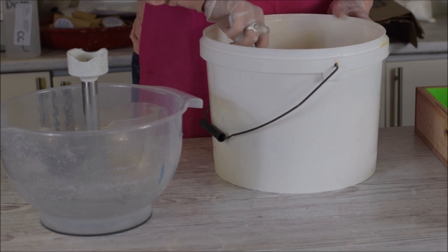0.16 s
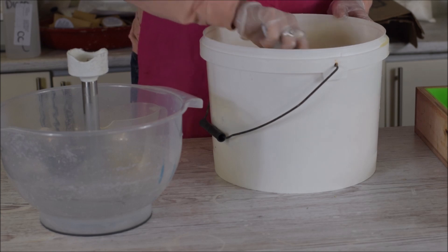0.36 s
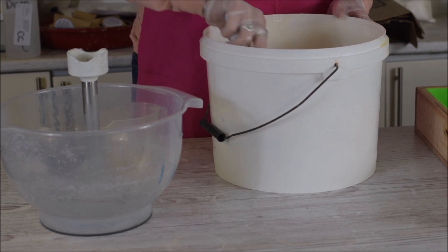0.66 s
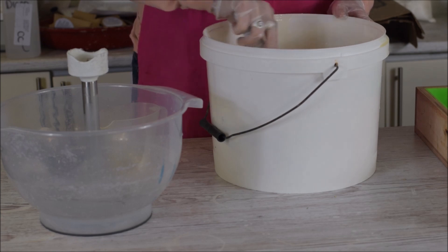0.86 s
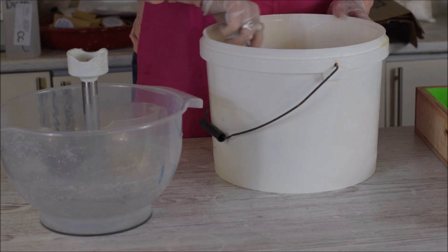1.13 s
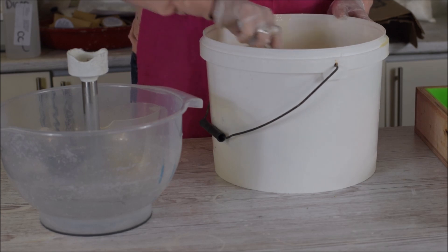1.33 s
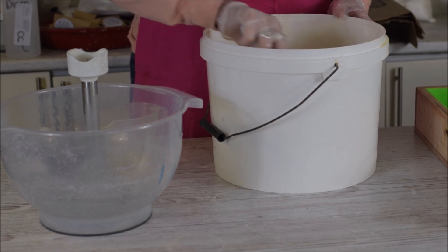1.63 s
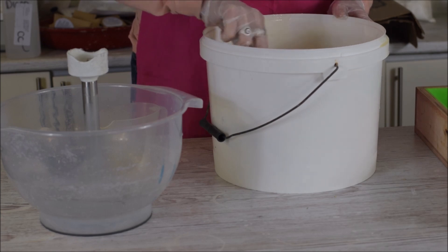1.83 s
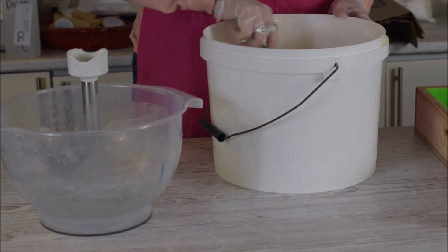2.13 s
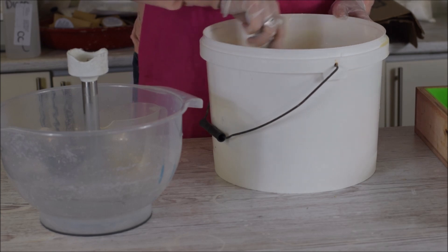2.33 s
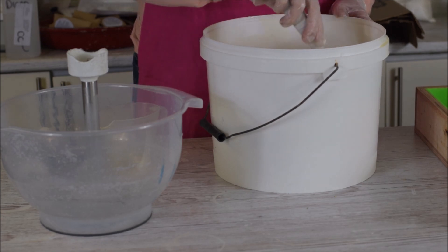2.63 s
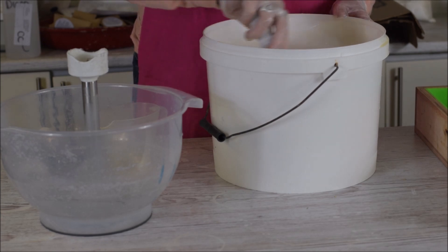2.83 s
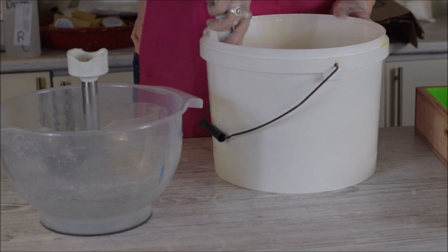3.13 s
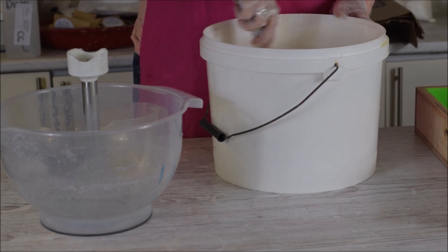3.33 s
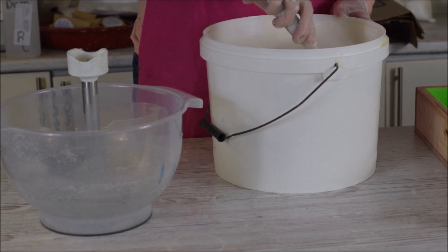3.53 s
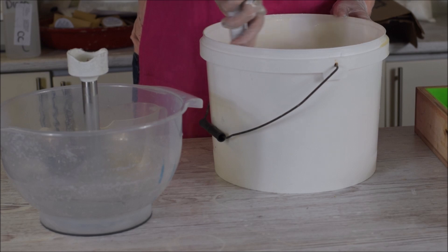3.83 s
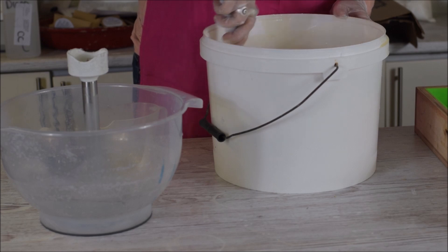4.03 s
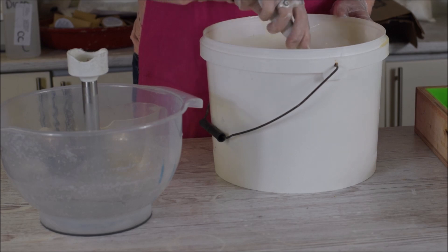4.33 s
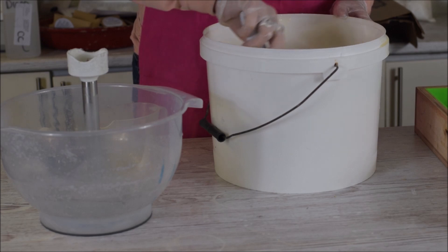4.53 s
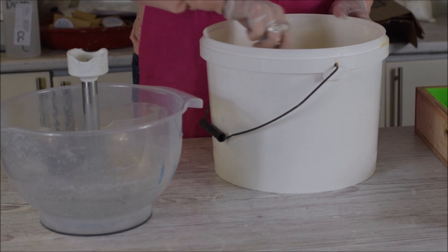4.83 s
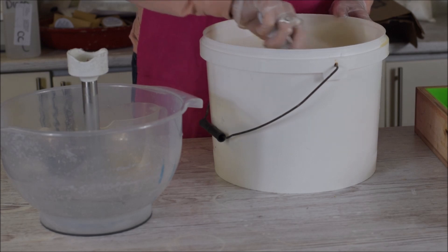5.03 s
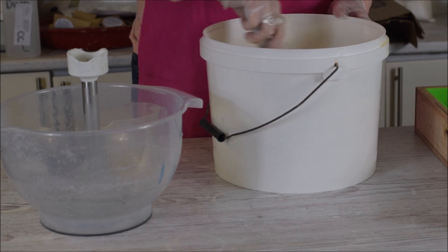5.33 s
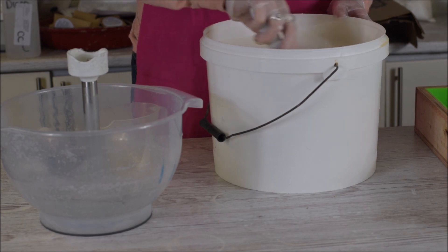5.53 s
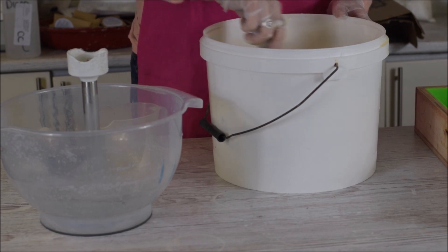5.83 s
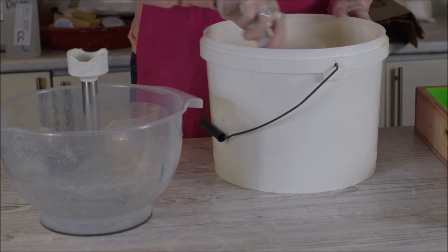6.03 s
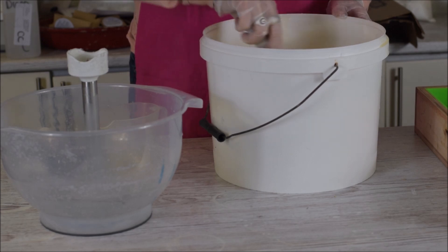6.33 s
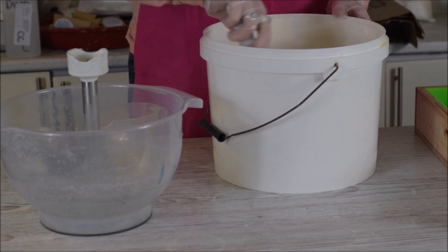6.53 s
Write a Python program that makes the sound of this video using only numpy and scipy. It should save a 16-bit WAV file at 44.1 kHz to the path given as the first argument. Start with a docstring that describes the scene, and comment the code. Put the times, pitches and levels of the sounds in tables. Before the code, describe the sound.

A hand stirs thick, wet batter in a plastic bucket, close and centred, in a small kitchen with a short, slightly ringing reverberation. Soft hiss and very faint mains hum run throughout. From 0 to 1.3 seconds, gentle swishes carry low bubble plops, a wet snap at 0.15, a click near 0.56 and a tap at 1.1. A rounded, gulping plop comes at 1.45, then a soft swish and a calmer stretch with a dull tap at 2.46. A fuller stroke with low rumble brings a bright pop at 3.35; light knocks follow at 3.6 and 3.9. Around 4.2 a sharp, rising wet snap bursts out, followed by a stronger slosh at 4.4. The loudest, hollow pop rings at 4.87. Crisp clicks follow at 5.1 and 5.55, a strong wet pop at 5.73, and smaller snaps at 6.27 and 6.5 as stirring continues.

```python
"""Stirring soap batter in a bucket

A gloved hand stirs thick soap batter in a plastic bucket, straight ahead of the microphones in a small kitchen.
Air pockets open as gliding tones; films snap, bubbles pop and fingers tap the bucket as short rings, cracks
and knocks; filtered noise with many tiny bubbles makes the soft swish of the batter. The bucket wall throws
back single echoes, the room adds a diffuse tail and ringing modes, over faint hum and microphone hiss.
"""
import sys
import numpy as np
from scipy import signal
from scipy.fft import rfft, irfft
from scipy.io import wavfile

SR = 44100
rng = np.random.default_rng(int(sys.argv[2]) if len(sys.argv) > 2 else 0)


def transcribe(u):
    """Save the signal u as a 16-bit wav file named by the first command-line argument.

    u: samples, shape (n,) or (channels, n), limited to [-1, 1]; the rate is SR.
    q: integer samples, one column per channel.
    """
    v = np.clip(np.atleast_2d(u).T, -1, 1)
    q = np.round(v * 32767).astype(np.int16)
    wavfile.write(sys.argv[1], SR, q)


N = 294147


def amp(db):
    """Decibels to gain."""
    return 10 ** (np.asarray(db) / 20)


def unit(x):
    """Scales to rms 1."""
    return x / np.sqrt(np.mean(x ** 2) + 1e-20)


def read(points, hz):
    """Reads a table on a log-frequency axis."""
    f, value = np.transpose(points)
    return np.interp(np.log(hz + 1), np.log(f + 1), value)


def colour(x, points):
    """Filters x by a spectrum in dB."""
    gain = amp(read(points, np.fft.rfftfreq(len(x), 1 / SR)))
    return irfft(rfft(x) * gain, len(x))


def add(mix, s, sound, room_db):
    """Places a sound on the direct path (row 0) and sends it into the room (row 1)."""
    start = max(round(s * SR), 0)
    part = mix[:, start:][:, :len(sound)]
    part += np.outer([1, amp(room_db)], sound[:part.shape[1]])


# spectrum of the microphone hiss: f/Hz, relative level/dB per Hz
HISS_SPECTRUM = [(12, -54), (20, -17), (37, -17), (70, -11.5), (98, -1), (130, -5.5), (317, -6), (355, -10),
                 (603, -10), (733, -12), (891, -9.5), (996, -11), (1840, -14.5), (2000, -15),
                 (15800, -18.5)]
# stereo spread of the hiss: f/Hz, side minus mid level/dB
HISS_SPREAD = [(60, -19), (110, -11.5), (200, -13.5), (380, -9.5), (700, -9.5), (1290, -10), (2380, -6),
               (4400, -5), (8120, -4), (15000, -3.5)]
HISS_DB = -50.5  # rms of the mid


def hiss():
    """Steady microphone hiss from two independent noises, wider in the treble: (mid, side)."""
    mid, side = (amp(HISS_DB) * unit(colour(noise, HISS_SPECTRUM)) for noise in rng.standard_normal((2, N)))
    return mid, colour(side, HISS_SPREAD)


# steady mains tones: f/Hz, rms level/dB
HUM_TONES = [(49.5, -64.5), (100, -71.5)]


def hum():
    """Mains hum: steady sines, each from a random phase."""
    t = np.arange(N) / SR
    return sum(amp(db) * np.sqrt(2) * np.sin(2 * np.pi * (hz * t + rng.random())) for hz, db in HUM_TONES)


# sweeps of the hand through the batter: t/s at the fastest point, swish level/dB,
# level/dB of the bucket's rumble on the table
HAND_STROKES = [(.17, -52.5, -60), (.48, -54.5, -74), (0.701, -62, -57), (1.12, -57, -61), (1.58, -53, -65),
                (2.48, -55, -70), (3.26, -53, -52.5), (3.72, -61, -62), (3.95, -56, -60),
                (4.388, -50.5, -52.5), (5.249, -66, -59), (5.63, -54.5, -66), (6.6, -55, -65)]
STROKE_RISE_S, STROKE_FALL_S = 0.1, 0.11  # time from the peak to 1/e on either side
DRAG_DB, STEADY_RUMBLE_DB = -62.5, -64.5  # the hand never quite stops


def sweeps():
    """Each sweep of the hand swells and fades over its steady drag: (gain of the swish, gain of the rumble)."""
    t = np.arange(N) / SR
    swells = np.zeros((2, N))
    for s, *levels in HAND_STROKES:
        width = np.where(t < s, STROKE_RISE_S, STROKE_FALL_S)
        swells += np.outer(amp(levels), np.exp(-((t - s) / width) ** 2))
    return np.hypot(amp([[DRAG_DB], [STEADY_RUMBLE_DB]]), swells)


# spectrum of sheared batter: f/Hz, relative level/dB per Hz
SWISH_SPECTRUM = [(100, 14), (220, -5), (380, 1.5), (650, -6), (1200, -2.5), (2000, -12), (4000, -16),
                  (9000, -33)]


def swish(per_s=170, spread_db=5.0, smooth_db=-5, level_db=-3):
    """Batter shears round the glove: a soft wash and many tiny bubbles at random moments."""
    sizes = amp(spread_db * np.minimum(rng.exponential(1, N), 3))
    sizes *= rng.random(N) < per_s / SR
    kind = rng.integers(0, 24, N)
    bubbles = np.zeros(N)
    for k, hz in enumerate(np.geomspace(250, 5000, 24)):
        # each tiny bubble lives for about five cycles
        grain = amp(read(SWISH_SPECTRUM, hz)) * plop(hz, hz * 1.1, 5 / hz, 0.097) * hz
        bubbles += signal.oaconvolve(sizes * (kind == k), grain)[:N]
    wash = unit(colour(rng.standard_normal(N), SWISH_SPECTRUM))
    return amp(level_db) * unit(unit(bubbles) + amp(smooth_db) * wash)


def rumble(low_hz=80, high_hz=120):
    """The stirring shakes bucket and table: noise in a narrow low band."""
    band = signal.butter(2, [low_hz, high_hz], "band", fs=SR, output="sos")
    return unit(signal.sosfilt(band, rng.standard_normal(N)))


def plop(start_hz, end_hz, life, swell, fullness=0.43, wobble=0.025):
    """An air pocket rings; its pitch glides unevenly as its mouth changes, and it dies as it collapses."""
    u = np.linspace(0, 1, max(round(life * SR), 8))
    swell = np.clip(swell, .02, .95)  # share of the life spent swelling
    rise_fall = np.interp(u, [0, swell, 1], [0, 1, 0])
    shape = np.sin(np.pi / 2 * rise_fall) ** (2 * fullness)
    waver = np.interp(u, np.linspace(0, 1, 10), rng.standard_normal(10))
    hz = (start_hz + (end_hz - start_hz) * u) * (1 + wobble * waver)
    return shape * np.sin(2 * np.pi * np.cumsum(hz) / SR)


# single bubbles of nearly steady pitch: t/s, starting f/Hz, peak level/dB
SINGLE_BUBBLES = [ (.027, 410, -44), (.08, 474, -46), (0.255, 379, -39.5), (0.663, 276, -46.5),
                  (0.819, 400, -45.5), (.95, 377, -50), (1.019, 323, -53.5), (1.085, 487, -34.5),
                  (1.145, 490, -49), (1.274, 420, -48), (1.41, 345, -49), (2.062, 882, -41),
                  (2.063, 344, -50.5), (2.463, 345, -46), (2.546, 3720, -48), (3.343, 2650, -34),
                  (3.392, 965, -41), (4.068, 865, -42), (4.1555, 928, -27.5), (4.297, 360, -45.5),
                  (4.333, 504, -47.5), (4.394, 346, -49.5), (4.805, 2494, -29), (4.815, 256, -42.5),
                  (5.637, 703, -32.5), (6.283, 1335, -38)]
BUBBLE_REF_HZ, BUBBLE_LIFE_S = 400, 0.018  # life at the reference pitch
BUBBLE_LIFE_POWER = 0.54  # smaller, higher bubbles die sooner
BUBBLE_RISE, BUBBLE_SWELL = 1.104, 0.084  # end pitch over start pitch; share of life spent swelling
BUBBLE_ROOM_DB = 3  # how much the bubbles feed the room


def single_bubbles(mix):
    """Small plops whose life and slight rise follow from their pitch."""
    for s, hz, db in SINGLE_BUBBLES:
        life = BUBBLE_LIFE_S * (BUBBLE_REF_HZ / hz) ** BUBBLE_LIFE_POWER
        add(mix, s, amp(db) * plop(hz, hz * BUBBLE_RISE, life, BUBBLE_SWELL), BUBBLE_ROOM_DB)


# large air pockets tearing open behind the hand: t/s, start f/Hz, end f/Hz, life t/s, peak level/dB,
# share of life spent swelling (0-1), level/dB sent to the room relative to the direct sound
AIR_POCKETS = [ (0.105, 620, 1900, .038, -34.5, .15, -0.5), (0.457, 316, 1480, 0.028, -47.5, .35, -1),
               (1.235, 700, 1680, 0.021, -37.5, 0.07, 0), (1.4386, 360, 381, 0.033, -30, 0.03, 3.5),
               (1.456, 424, 496, 0.035, -25, 0.7, -10.5), (1.461, 444, 1210, .023, -25.5, .5, 4.5),
               (4.2336, 986, 1400, .0063, -16.5, 0.71, 2), (4.235, 850, 4545, .01, -10, 0.5, 0),
               (4.239, 3750, 4900, 0.0045, -37, 1, 1), (4.245, 1680, 2240, 0.0048, -22, 0.54, 2),
               (4.8641, 1016, 1170, 0.0091, -6, .27, -1.5), (4.87, 1163, 1670, 0.0083, -14, 0.34, 3),
               (5.728, 880, 1900, 0.0043, -12, .45, -1)]


def air_pockets(mix):
    """Large pockets tear open and glide upward in pitch as they ring."""
    for s, start_hz, end_hz, life, db, swell, room_db in AIR_POCKETS:
        add(mix, s, amp(db) * plop(start_hz, end_hz, life, swell), room_db)


def burst(t, hz, cycles):
    """A ring that swells for the given cycles and dies quickly, the sooner the higher its pitch."""
    turns = np.maximum(t, 0) * hz
    u = turns / cycles
    return u * np.exp(1 - u) * np.sin(2 * np.pi * turns)


# spectrum of the cracks: f/Hz, relative level/dB
CRACK_SPECTRUM = [(200, -39), (1000, 8.5), (3000, 0), (5500, 8), (8000, -4), (11000, -2.5), (15000, -15)]


def crack(t, fade_s=0.0022):
    """A short wet crack: coloured noise that dies exponentially."""
    return unit(colour(rng.standard_normal(len(t)), CRACK_SPECTRUM)) * np.exp(-t / fade_s)


# ringing modes of the bucket with batter in it: f/Hz, relative level/dB, 60 dB decay t/s
BUCKET_MODES = [(258, -46, 0.057), (360, -4.5, 0.023), (463.5, -0.5, 0.031), (785, 3.5, 0.0093),
                (985, -16, 0.09)]


def knock(t):
    """The filled bucket, once struck, rings in a few damped modes."""
    return sum(amp(db - 60 * t / t60) * np.sin(2 * np.pi * f * t) for f, db, t60 in BUCKET_MODES) / 2


def ring_crack_knock(hz, cycles, ring_db, crack_db, knock_db, spatter_db=-15, spatter_s=.04, count=5):
    """A short ring with smaller rings spattering after it, a crack of noise and a knock on the bucket."""
    t = np.arange(4096) / SR
    spatter = np.zeros(len(t))
    for when, pitch in rng.random((count, 2)):
        # later rings are weaker; pitches lie within half an octave of the first
        small = burst(t - when * spatter_s, hz * 2 ** (pitch - .5), cycles)
        spatter += amp(spatter_db) * np.exp(-when) * small
    ring = burst(t, hz, cycles) + spatter
    return amp(ring_db) * ring + amp(crack_db) * crack(t) + amp(knock_db) * knock(t)


# short rings, cracks and knocks (films snapping, bubbles popping, fingers tapping the bucket):
# t/s, ring f/Hz, cycles until the ring peaks, ring level/dB, crack level/dB, knock level/dB
SHORT_HITS = [ (.1558, 3250, 0.46, -22.5, -32, -45), (0.5621, 2450, 0.83, -29, -44, -54),
              (.669, 700, 1, -44, -57, -42), (1.0814, 1670, 0.2, -31.5, -46, -36.5),
              (1.4402, 2530, 0.46, -31.5, -50, -54), (1.4448, 1930, 1.14, -32.5, -52, -52),
              (2.4604, 800, .3, -55, -57, -36.5), (3.3411, 3100, 1.4, -25, -33.5, -38),
              (3.6323, 1930, 0.23, -30, -41, -46), (3.9043, 1250, .4, -33.5, -50, -32),
              (3.949, 1220, .4, -52, -61, -39), (4.1569, 2350, .35, -31, -33, -31),
              (4.2067, 3050, 1.04, -22, -40, -50), (4.2066, 5900, 0.84, -14, -27.5, -30),
              (4.395, 1900, 0.31, -42, -37, -33), (4.552, 5840, 2.3, -41.5, -47, -74),
              (4.8054, 3200, .85, -23, -49, -34.5), (4.8647, 3170, 1.9, -20.5, -36.5, -38),
              (4.865, 4130, 3.9, -30.5, -54, -52), (5.0833, 5600, 0.88, -23, -30, -65),
              (5.1795, 860, 1.6, -38.5, -51, -49), (5.1795, 2430, 0.51, -30, -45, -55),
              (5.5158, 3850, 1.1, -30, -45, -65), (5.5647, 2760, 0.77, -21, -38.5, -52),
              (5.646, 2300, 1.8, -32, -45, -52), (5.726, 2050, 1, -16, -27, -41),
              (5.7259, 2840, 0.61, -13, -36, -53), (6.273, 3040, 0.78, -18.5, -35, -37.5),
              (6.2728, 1330, 0.56, -25.5, -46, -60), (6.4591, 3440, 1.6, -20.5, -36.5, -60),
              (6.5202, 2200, .3, -29, -42, -53)]
HIT_ROOM_DB = 1.5  # how much they feed the room


def short_hits(mix):
    """Films snap, bubbles pop and fingers tap the bucket: each mixes ring, crack and knock in its own balance."""
    for s, *hit in SHORT_HITS:
        add(mix, s, ring_crack_knock(*hit), HIT_ROOM_DB)


# first reflections from bucket wall, table and cupboards: delay t/s, signed gain
FIRST_ECHOES = [(.0006, 0.3), (.0011, 0.25), (.0019, -0.21), (.0031, 0.3), (.0044, -0.25), (.0062, 0.19),
                (.0112, -0.069), (0.0118, 0.16), (0.0142, 0.15)]


def reflections(x):
    """Direct sound and single echoes; the first has travelled about 20 cm farther."""
    return x + sum(gain * np.pad(x, (round(s * SR), 0))[:N] for s, gain in FIRST_ECHOES)


# decay of the kitchen's diffuse tail: f/Hz, 60 dB decay t/s
TAIL_DECAY = [(150, 0.094), (350, 0.35), (700, 0.42), (1200, 0.41), (2500, 0.39), (5000, 0.39),
              (12000, 0.2)]
# colour of the tail at its start: f/Hz, relative level/dB
TAIL_COLOUR = [(100, -15), (350, 0), (700, -4), (1050, 0.5), (1400, 4), (2000, 0), (3000, -2.5), (6000, -2),
               (14000, -1)]


def room(x, first_s=0.0025, build_s=0.0056):
    """A diffuse tail of sparse random taps; each band dies at its own speed."""
    taps = np.zeros(SR)
    at = np.arange(0, SR - 10, 10)
    taps[at + rng.integers(0, 10, len(at))] = rng.choice([-1, 1], len(at))
    hz, t, z = signal.stft(taps, SR, nperseg=256)
    z = z * amp(read(TAIL_COLOUR, hz)[:, None] - 60 * t / read(TAIL_DECAY, hz)[:, None])
    tail = signal.istft(z, SR, nperseg=256)[1][:SR]
    # silent until first_s, then building up over build_s
    tail = tail * np.clip((np.arange(SR) / SR - first_s) / build_s, 0, 1)
    return signal.fftconvolve(x, tail / np.linalg.norm(tail))[:N]


# the strongest standing waves of the kitchen: f/Hz, level/dB of the gain at resonance
STANDING_WAVES = [(359, -3), (402, -5), (475, 9), (735, 8), (880, -19), (943, -25), (985, -30), (1051, -11),
                  (1162, 9), (1200, -6), (1240, 3.5), (1403, 8.5), (1485, 2.5), (1598, -7), (1817, -7),
                  (2055, 11), (2515, -1), (2623, -12), (2775, 12), (3283, -7), (3750, 5.5)]


def standing_waves(x, t60=0.32):
    """Single room modes ring on when a sound excites their frequency."""
    t = np.arange(SR) / SR
    decay = np.exp(-np.log(1000) * t / t60)
    ring = sum(amp(db) * np.cos(2 * np.pi * hz * t) for hz, db in STANDING_WAVES)
    return signal.fftconvolve(x, 2 * ring * decay / decay.sum())[:N]


def scene(room_db=-3, room_side_db=-37, lowest_hz=170):
    """The bucket stands straight ahead; only the room and the hiss have some width."""
    hiss_mid, hiss_side = hiss()
    drag, shake = sweeps()
    batter = np.zeros((2, N))
    single_bubbles(batter)
    air_pockets(batter)
    short_hits(batter)
    batter += drag * swish()
    # such small sources radiate little bass
    thin = signal.butter(2, lowest_hz, "high", fs=SR, output="sos")
    direct, sent = signal.sosfilt(thin, batter)
    mid = reflections(direct) + amp(room_db) * room(sent) + standing_waves(sent)
    mid += shake * rumble() + hiss_mid + hum()
    side = amp(room_side_db) * room(sent) + hiss_side
    return np.array([mid + side, mid - side])


EDGE_HZ = 15950


def record(dry):
    """The recorder's band limit: a steep low-pass on both channels."""
    low_pass = signal.firwin(511, EDGE_HZ, window=("kaiser", 9), fs=SR)
    return signal.oaconvolve(dry, low_pass[None], "same")


dry = scene()
out = record(dry)
transcribe(out)
```